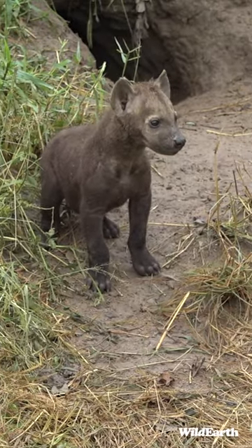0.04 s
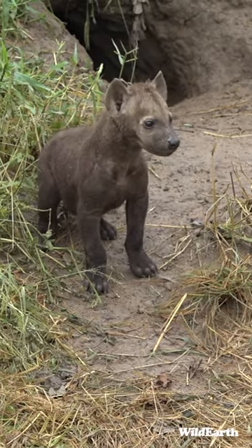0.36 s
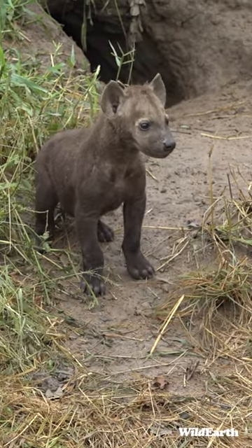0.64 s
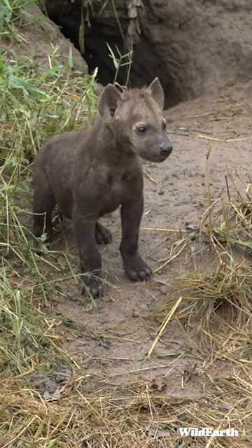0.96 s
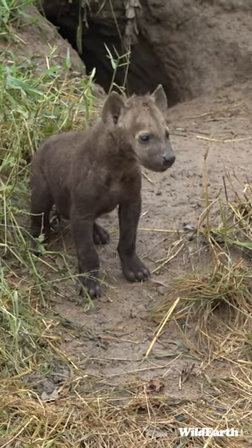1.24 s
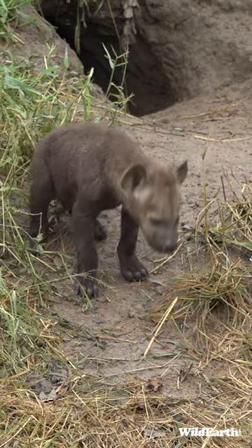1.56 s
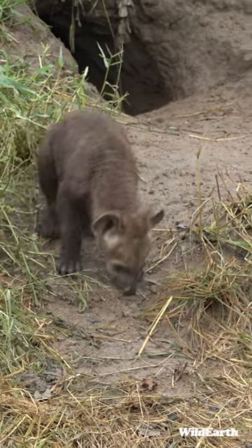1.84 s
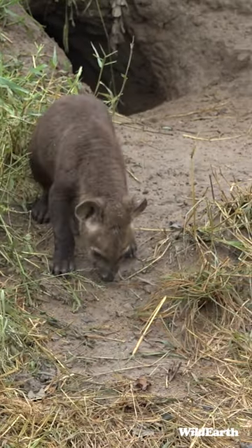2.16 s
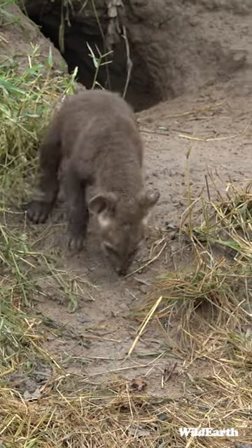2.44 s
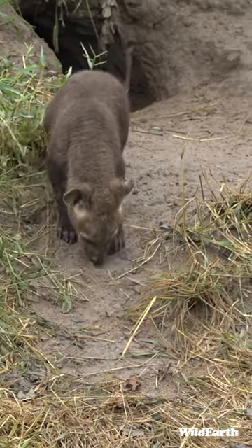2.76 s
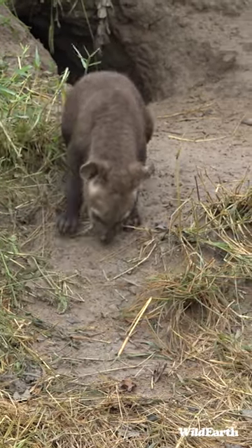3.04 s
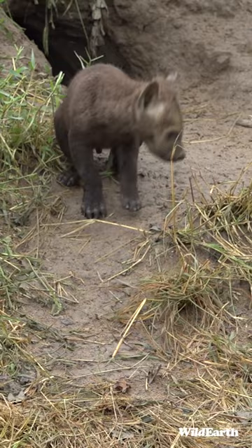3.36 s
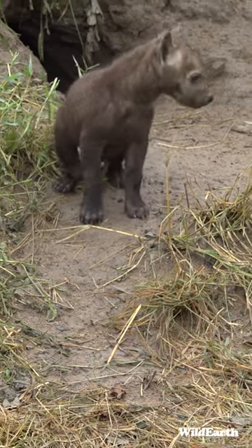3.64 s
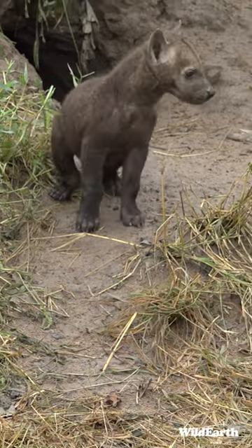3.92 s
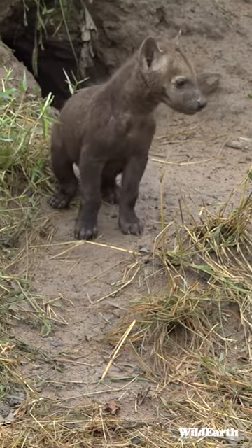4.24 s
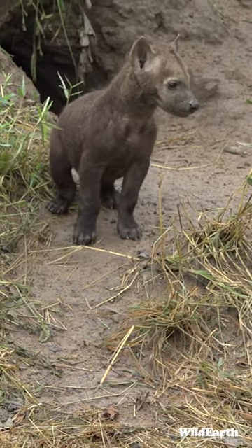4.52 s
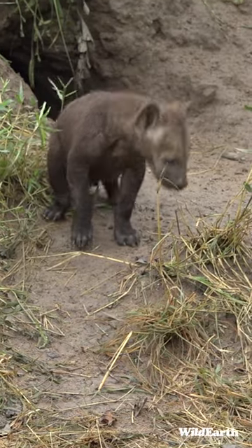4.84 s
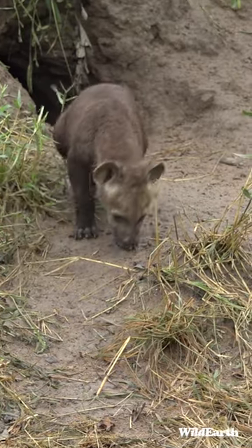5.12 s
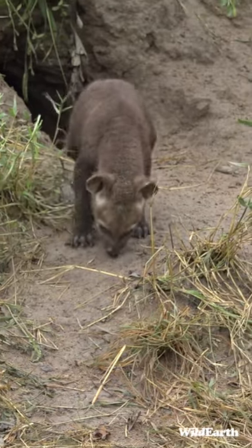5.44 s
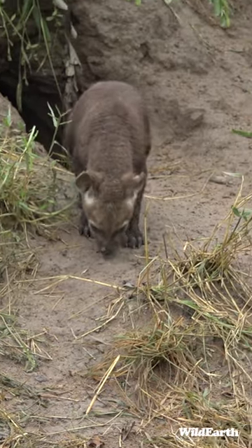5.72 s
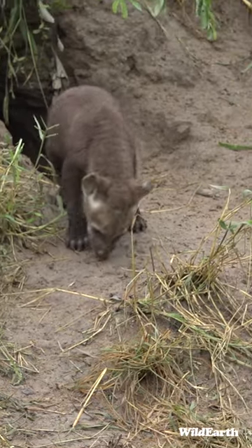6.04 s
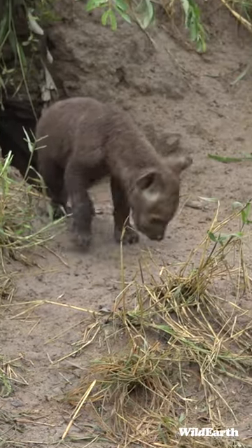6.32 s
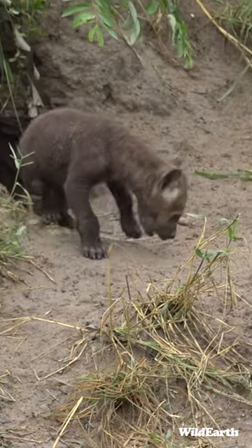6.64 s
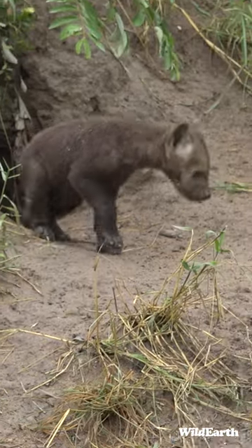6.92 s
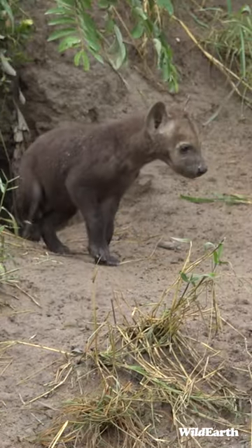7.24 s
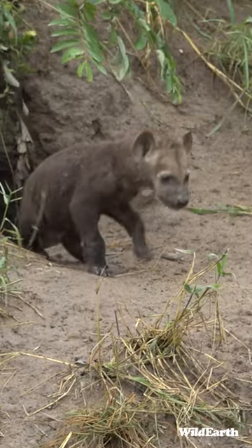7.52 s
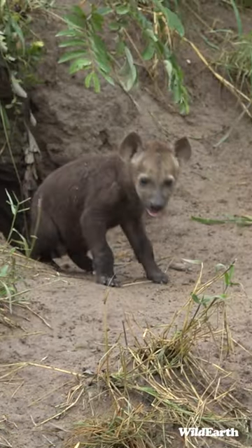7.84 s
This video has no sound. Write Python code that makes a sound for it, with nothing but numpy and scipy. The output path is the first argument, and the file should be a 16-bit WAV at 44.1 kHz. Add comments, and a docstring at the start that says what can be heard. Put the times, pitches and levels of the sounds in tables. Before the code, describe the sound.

A hyena cub gives two long whoops outside its den, close to the microphone and with almost no echo. Each starts soft and hoarse, climbs slowly in pitch and loudness, then cracks into a high note and drops away. The first peaks higher than the second. Behind them are quiet outdoor air, a low electric hum, faint distant birds and a few soft bumps and ticks of paws.

```python
"""Outside a den in the bush, a hyena cub gives two long whoops. Its vocal folds climb slowly, flip into
a high register and fall away, hoarse at both ends, while throat, mouth and nose colour the harmonics.
The ground and the bush throw the calls back faintly. Behind them lie an electric hum, quiet air,
distant birds, a far moan, a few dull bumps and the cub's paws on sand and dry grass."""
import sys
import numpy as np
from scipy import signal
from scipy.fft import rfft, irfft, next_fast_len
from scipy.io import wavfile
from scipy.ndimage import uniform_filter1d

SR = 44100
rng = np.random.default_rng(int(sys.argv[2]) if len(sys.argv) > 2 else 0)


def store_wav(level_fs):
    """Save 16-bit WAV to argv[1]."""
    pcm = np.round(np.clip(np.atleast_2d(level_fs), -1, 1) * 32767)
    wavfile.write(sys.argv[1], SR, pcm.T.astype(np.int16))


N = 347508
EDGE_HZ = 15750
SETTLE_S = .1  # the folds settle after each onset


def amp(db):
    """Decibels to gain."""
    return 10 ** (np.asarray(db) / 20)


def unit(x):
    """Scales to rms 1."""
    return x / np.sqrt(np.mean(x ** 2) + 1e-20)


def read(points, hz):
    """Reads a curve along a log-frequency axis."""
    f, value = np.transpose(points)
    return np.interp(np.log(hz + 1), np.log(f + 1), value)


def add(mix, s, sound):
    """Mixes a sound in at time s."""
    part = mix[max(round(s * SR), 0):][:len(sound)]
    part += sound[:len(part)]


def noise(spectrum, size):
    """Noise of rms 1 with the given spectrum."""
    gain = amp(read(spectrum, np.fft.rfftfreq(size, 1 / SR)))
    return unit(irfft(rfft(rng.standard_normal(size)) * gain, size))


def band(hz, width_hz, size):
    """Noise of rms near 1 in a bell around hz; around zero it is a slow random wobble."""
    full = next_fast_len(size + SR)
    bell = np.exp(-.5 * ((np.fft.rfftfreq(full, 1 / SR) - hz) / width_hz) ** 2)
    return unit(irfft(rfft(rng.standard_normal(full)) * bell, full))[:size]


def air(level_db=-55.5):
    """A quiet, dark bed of outdoor air."""
    # air spectrum: f/Hz, relative level/dB
    spectrum = [(20, -26.5), (45, -7), (110, 1), (230, 2.5), (340, -11.5), (700, -8.5), (1300, -17),
                (2200, -21.5), (3700, -26), (4400, -31), (5200, -33), (6200, -37), (7300, -34), (9000, -39),
                (15500, -35)]
    return amp(level_db) * noise(spectrum, N)


def hum(drift_hz=.6, waver=0.077, trim_db=1.5):
    """Electric hum: steady machine tones that drift apart a little and swell together."""
    # hum partials: f/Hz, level before trim/dB
    partials = [(118.4, -62.5), (140.0, -52), (193.8, -59.5), (419.9, -70), (463.0, -74), (559.9, -70.5),
                (592.2, -69.5), (705.2, -71), (1039, -82), (1157, -76), (2315, -75.5), (3375, -87)]
    drift, swell = band(0, 0.64, N), band(0, 3.6, N)
    out = np.zeros(N)
    for hz, db in partials:
        pitch = hz + drift_hz * np.roll(drift, rng.integers(N))
        turns = np.cumsum(pitch) / SR + rng.random()
        out += amp(db + trim_db) * np.sqrt(2) * np.sin(2 * np.pi * turns)
    return out * (1 + waver * swell)


def birds(buzz_width_hz=270, warble=0.0093):
    """Distant birds: short gliding whistles and narrow buzzes of noise."""
    # whistles: t/s, length/s, start f/Hz, middle f/Hz, end f/Hz, level/dB
    whistles = [(0.176, 0.049, 2630, 2590, 2030, -65.5), (.33, .09, 1920, 2160, 2030, -68.5),
                (.54, 0.075, 2180, 2020, 1900, -75), (1.36, 0.042, 2250, 2050, 2020, -74),
                (3.551, 0.065, 2755, 2490, 2395, -63), (3.689, 0.074, 2312, 2314, 2320, -63),
                (5.452, 0.052, 2930, 2470, 2280, -61), (6.904, 0.16, 2192, 2217, 2200, -63),
                (7.046, 0.042, 1880, 1960, 2075, -62), (7.123, 0.017, 2730, 3240, 3010, -61)]
    # buzzing calls: t/s, length/s, centre f/Hz, level/dB
    buzzes = [(0, 0.21, 4870, -82), (.35, .32, 5060, -80), (1.382, 0.3, 4760, -74.5),
              (3.273, .26, 4847, -73.5), (3.645, .4, 5000, -80.5), (7.33, 0.35, 5130, -80.5)]
    out = np.zeros(N)
    for s, length, start_hz, middle_hz, end_hz, db in whistles:
        u = np.linspace(0, 1, int(length * SR))
        glide = np.polyval(np.polyfit([0, .5, 1], [start_hz, middle_hz, end_hz], 2), u)
        hz = glide * (1 + warble * band(0, 80, len(u)))
        tone = np.sin(2 * np.pi * np.cumsum(hz) / SR)
        add(out, s, amp(db) * unit(tone * signal.windows.tukey(len(u), .6)))
    for s, length, hz, db in buzzes:
        size = int(length * SR)
        add(out, s, amp(db) * unit(band(hz, buzz_width_hz, size) * signal.windows.tukey(size, .8)))
    return out


def moan():
    """A faint low moan far off: one pure gliding tone."""
    # moan contour: t/s, pitch/Hz, level/dB
    contour = [(1.72, 325, -67), (1.8, 311, -68), (1.9, 281.5, -64), (2.001, 282, -60.5),
               (2.13, 281.4, -59), (2.239, 270, -66.5), (2.339, 288, -63), (2.5, 300, -74.5),
               (2.583, 300, -81.5)]
    s, hz, db = np.transpose(contour)
    t = np.arange(N) / SR
    phase = 2 * np.pi * np.cumsum(np.interp(t, s, hz)) / SR
    return np.sqrt(2) * np.interp(t, s, amp(db), 0, 0) * np.sin(phase)


def bush(x, echo_db, onset_s=.015, echoes_per_s=2000):
    """Scattered echoes from bank and shrubs; the top treble dies first."""
    # echo decay: f/Hz, t60/s
    decay = [(300, 0.27), (1000, 0.31), (2500, 0.38), (8000, .18)]
    taps = rng.standard_normal(SR) * (rng.random(SR) < echoes_per_s / SR)
    hz, t, spectra = signal.stft(taps, SR, nperseg=256)
    spectra = spectra * amp(-60 * t / read(decay, hz)[:, None]) * (1 - np.exp(-t / onset_s))
    tail = signal.istft(spectra, SR, nperseg=256)[1]
    return amp(echo_db) * signal.fftconvolve(x, tail / np.linalg.norm(tail))[:N]


def puffs(rows, spread):
    """Noise bursts with a quick rise and a slower fall; spread is bandwidth over centre frequency."""
    out = np.zeros(N)
    for s, length, hz, db in rows:
        u = np.linspace(0, 1, int(length * SR))
        add(out, s, amp(db) * unit(band(hz, spread * hz, len(u)) * np.sin(np.pi * u) * (1 - u)))
    return out


def bumps_and_ticks():
    """Dull bumps, then faint ticks and rustles: paws on sand and grass, and the click of a bird's chirp."""
    # low bumps: t/s, length/s, centre f/Hz, level/dB
    bumps = [(2.225, 0.065, 51.7, -40), (2.3, 0.074, 52, -53), (6.42, 0.22, 72.4, -56),
             (7.53, 0.06, 241, -54), (7.68, 0.023, 75.3, -45), (7.682, 0.03, 203, -45.5),
             (7.66, 0.19, 54.8, -55.5)]
    # faint ticks and rustles: t/s, length/s, centre f/Hz, level/dB
    ticks = [(.078, 0.009, 6000, -73), (1.875, .05, 7800, -72), (2.725, 0.058, 7500, -78),
             (4.74, 0.0082, 1500, -61), (4.787, 0.012, 3200, -65), (4.788, .008, 7000, -72),
             (5.595, .025, 5800, -62), (5.94, 0.02, 8700, -81), (6.0, 0.044, 8700, -84),
             (6.125, 0.044, 7000, -71), (6.355, 0.023, 6500, -73), (7.106, 0.01, 5500, -73.5),
             (7.133, 0.012, 3800, -69.5), (7.515, 0.0086, 6500, -76.5)]
    return puffs(bumps, spread=0.17) + puffs(ticks, spread=0.24)


def resonance_gain(resonances, hz):
    """Gain at hz of a set of resonances, summed in power."""
    grid = np.arange(0, SR / 2, 10)
    power = sum((amp(db) / (1 + ((grid - f) / (width / 2)) ** 2)) ** 2 for f, width, db in resonances)
    return np.interp(hz, grid, np.sqrt(power))


def vocal_tract(source, hz, age, throat, hollow_db, hollow_hz=1320, hollow_width_hz=20, open_s=.16):
    """Throat and mouth shape the overtone gains; a nasal ring fades as the mouth opens."""
    # faint sheen on top of the voice: f/Hz, width/Hz, gain/dB
    sheen = [(15400, 600, -60)]
    # nasal resonances with the mouth shut: f/Hz, width/Hz, gain/dB
    nose = [(1815, 89, -10.5), (2781, 160, -11.5), (3250, 160, -16.5), (3740, 330, -15.5), (9200, 700, -33)]
    oral = source * resonance_gain(throat + sheen, hz) * (hz < EDGE_HZ)
    hollow = amp(hollow_db * np.exp(-((hz - hollow_hz) / hollow_width_hz) ** 2))
    return oral * hollow + np.exp(-age / open_s) * resonance_gain(nose, hz)


def ground_bounce(hz, bounce_db=-10, delay_s=.0013):
    """Comb-filter gain of a ground reflection whose delay wanders slowly."""
    delay = delay_s * (1 + .08 * band(0, 1.7, hz.shape[1]))
    return abs(1 + amp(bounce_db) * np.exp(2j * np.pi * hz * delay))


def hoarseness(t, let_go_s=0.07):
    """Roughness and air leak of the folds: high at the onset, low when held, rising as they let go."""
    # husky stretches where more air leaks: t/s, half length/s, level relative to the tone/dB
    husky = [(2.421, .13, -45.5), (2.675, 0.14, -36.5), (2.842, 0.016, -35), (6.184, 0.06, -28.5)]
    starting = np.exp(-(t - t[0]) / SETTLE_S)
    ending = np.clip(1 - (t[-1] - t) / let_go_s, 0, 1)
    rough = 0.013 + .11 * starting + 0.204 * ending
    leak = amp(-41) + amp(-33) * starting + amp(-19.5) * ending ** 2
    return rough, leak + sum(amp(db) * np.exp(-((t - s) / half) ** 2) for s, half, db in husky)


def breath(phase):
    """Air escapes in a puff each time the folds open."""
    # breath spectrum: f/Hz, relative level/dB
    rasp = [(250, -37.5), (600, -10), (1100, -6), (1600, -6.5), (2350, 1), (2900, -6.5), (3400, -23),
            (4000, -19), (5200, -20.5), (8000, -33), (10000, -38), (15000, -37)]
    return (1 + np.cos(phase)) * noise(rasp, len(phase))


def register_breaks(t):
    """The level dips as the folds stall for an instant between registers."""
    # stalls: t/s, width/s, depth/0-1
    stalls = [(2.824, 0.0035, 0.03), (3.232, 0.0029, 0.45), (6.561, 0.0046, 0.57), (6.677, 0.0074, 0.5)]
    return np.prod([1 - depth * np.exp(-((t - s) / width) ** 2) for s, width, depth in stalls], axis=0)


def whoop(climb, arch, throat, second_db, fourth_db, arch_third_db, arch_tilt_db, hollow_db,
          jitter=0.08, shimmer=0.31, waver=0.0021, flutter_db=2.5,
          rounding_db=-8.5, easy_hz=560, treble_db=0.2, release_s=0.017):
    """The folds climb in the low register and flip into the high one. Returns start time and sound."""
    s, *columns = np.vstack([climb, arch]).T
    t = np.arange(s[0] - .01, s[-1] + 0.009, 1 / SR)
    size, age = len(t), t - t[0]
    hz, level_db, lead_db, bright_db = (uniform_filter1d(np.interp(t, s, c), size=200) for c in columns)
    # hoarse folds vary from cycle to cycle in period (jitter) and strength (shimmer)
    rough, leak = hoarseness(t)
    pitch = hz * (1 + jitter * rough * band(0, 190, size) + waver * band(0, 30, size))
    phase = 2 * np.pi * np.cumsum(pitch) / SR
    k = np.arange(1, 29)[:, None]  # harmonic numbers
    octaves = np.log2(k / 5)  # tilts pivot on the fifth harmonic
    # low register: the second harmonic grows in, and the pulse rounds off as the pitch climbs
    thin_db = -13.5 * np.exp(-age / SETTLE_S)
    upper_db = bright_db + rounding_db * octaves * np.log2(hz / easy_hz)
    low_db = np.select([k == 2, k == 3, k == 4], [second_db + thin_db, lead_db, upper_db + fourth_db],
                       upper_db + treble_db)
    # high register: the second harmonic takes the lead
    high_db = np.where(k == 2, lead_db, bright_db + arch_tilt_db * octaves + arch_third_db * (k == 3))
    flipped = np.interp(t, [climb[-1][0], arch[0][0]], [0, 1])
    source = amp(low_db + flipped * (high_db - low_db))
    gains = vocal_tract(source, k * hz, age, throat, hollow_db)
    # the fundamental stays unshaped; harmonics from the fifth up flutter and cross the ground's notches
    flutter = amp(flutter_db * np.array([band(0, 8.7, size) for _ in k]))
    levels = amp(level_db) * np.select([k == 1, k < 5], [1, gains], gains * flutter * ground_bounce(k * hz))
    tone = np.sqrt(2) * (levels * np.cos(k * phase + rng.uniform(0, 2 * np.pi, k.shape))).sum(0)
    tone *= (1 + shimmer * rough * band(0, 300, size)) * register_breaks(t)
    rasp = leak * np.linalg.norm(levels, axis=0) * breath(phase)
    release = np.minimum((t[-1] - t) / release_s, 1)
    return t[0], (tone + rasp) * release * signal.windows.tukey(size, .01)


def cub():
    """Two whoops, each a slow climb and then an arch and fall, with the voice catching and cracking."""
    # voice cracks: t/s, length/s, centre f/Hz, level/dB
    cracks = [(1.626, 0.016, 1000, -58), (2.82, 0.022, 2650, -31), (2.821, 0.013, 4350, -57),
              (3.268, 0.018, 2484, -35.5), (4.881, 0.017, 1610, -66.5), (6.553, 0.013, 2436, -50),
              (6.728, 0.032, 2280, -37.5)]
    # low-register climbs: t/s, pitch/Hz, fundamental level/dB, third harmonic boost/dB, brightness/dB
    first_climb = [(1.631, 486.7, -44, -12, -23), (1.677, 473.7, -44, -19, -12),
                   (1.765, 482.3, -41.5, -9, -17), (1.887, 504.0, -37, -1, -8.5),
                   (1.955, 512.3, -36.5, -0.4, -1.9), (2.134, 541.0, -32.4, 1.3, 1.1),
                   (2.243, 561.5, -30.6, 4, 1.0), (2.3, 579.7, -28, 13.5, -1),
                   (2.335, 584.7, -26.5, 10, -2), (2.422, 613.2, -26, 12.4, -9.5),
                   (2.533, 658.0, -22.8, 7.5, 0.5), (2.591, 672.8, -19.4, -1.5, -8.5),
                   (2.728, 724.8, -17.5, 8.5, -24.5), (2.788, 755.6, -18.5, 17.5, -7.5),
                   (2.815, 808.2, -18, 12, -12)]
    second_climb = [(4.888, 451, -47.0, -21, -16), (4.955, 462, -48, -16.0, -16),
                    (5.061, 470.7, -42, -1.5, -8.5), (5.268, 487.6, -39.5, 11, -6),
                    (5.424, 524.9, -35.7, 16.5, 2), (5.592, 545, -33.0, 16, 1),
                    (5.672, 561.6, -31, 16.5, 5), (5.79, 580, -30, 21.5, 2.5),
                    (5.904, 589.5, -28.5, 20.5, 2), (6.04, 627.1, -27, 16.5, -8),
                    (6.199, 670.4, -25, 10, -6), (6.314, 676.5, -26.5, 3.5, -9),
                    (6.385, 739, -20, 1.4, -18), (6.498, 796.4, -18, 10, -19), (6.55, 848, -15.5, 0.2, -17)]
    # high-register arches: t/s, pitch/Hz, fundamental level/dB, second harmonic boost/dB, brightness/dB
    first_arch = [(2.834, 955.7, -21, 15.5, -22), (2.898, 1067, -22.5, 17.0, -0.66),
                  (2.948, 1158, -21, 22, -5), (3.015, 1303.8, -21.5, 16, -6),
                  (3.121, 1444.3, -21.0, -0.7, 6.5), (3.168, 1437, -20.6, -2, 0.5),
                  (3.208, 1318, -20.5, 15.5, -8.5), (3.244, 1012, -10, -1.3, -14),
                  (3.27, 753, -34.5, 5.5, 2.0), (3.296, 519, -42, 16.5, 1.5)]
    second_arch = [(6.558, 934, -15.5, -3.8, -25.0), (6.613, 990, -20.5, -0.5, -23.0),
                   (6.657, 972.5, -18, -1.5, -21.5), (6.676, 905, -14, -17, -22.5),
                   (6.724, 853, -19.5, 0.5, -23.0), (6.758, 641.9, -48, 11, 3),
                   (6.81, 486, -48, 12.3, -4.0)]
    # resonances of throat, mouth and nose in each whoop: f/Hz, width/Hz, gain/dB
    first_throat = [(1002.0, 330, 4.5), (1600, 238, -1.2), (2380, 693.0, -12.5), (2873, 210, -11.5),
                    (3010, 212.0, -14.5), (3700, 448.0, -19), (4020, 412.0, -22), (5193, 616.0, -24),
                    (6444, 399.0, -37), (7932.0, 967.0, -47), (9400.0, 420, -41.0),
                    (13000.0, 3000.0, -60.0)]
    second_throat = [(976, 340, 3), (1840, 293.0, -20), (2200, 1140, -15.5), (2790, 177.0, -15),
                     (3074, 340, -18.5), (3875, 260, -18.5), (4080, 220, -14.5), (5090.0, 430, -24),
                     (6000, 2000, -36), (8197.0, 910, -45.5), (9520, 510, -41.5), (12511.0, 3883.0, -69)]
    out = puffs(cracks, spread=0.06)
    add(out, *whoop(first_climb, first_arch, first_throat, second_db=-8.5, fourth_db=4.5,
                    arch_third_db=-9.5, arch_tilt_db=0.5, hollow_db=-2.5))
    add(out, *whoop(second_climb, second_arch, second_throat, second_db=-6.0, fourth_db=4.0,
                    arch_third_db=15.5, arch_tilt_db=3.0, hollow_db=-18))
    return out


def scene():
    """The cub close and nearly dry, birds and moan far off with more echo, hum and air all round."""
    near = cub()
    far = birds() + moan()
    bed = bumps_and_ticks() + air()
    return (near + bush(near, echo_db=-27.5) + far + bush(far, echo_db=-12.0) + bed + hum())[None]


def record(dry, low_cut_hz=36):
    """The microphone's low cut and the recorder's band limit."""
    low_cut = signal.butter(N=4, Wn=low_cut_hz, btype="high", fs=SR, output="sos")
    band_limit = signal.firwin(511, EDGE_HZ, window=("kaiser", 9), fs=SR)
    return signal.oaconvolve(signal.sosfilt(low_cut, dry), band_limit[None], "same")


dry = scene()
out = record(dry)
store_wav(out)
```